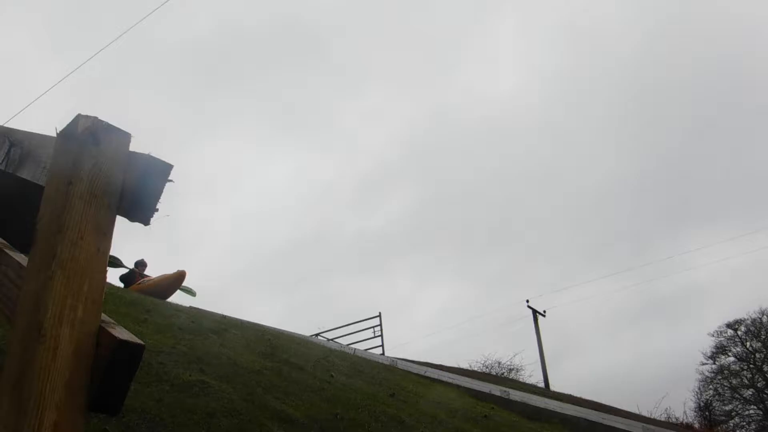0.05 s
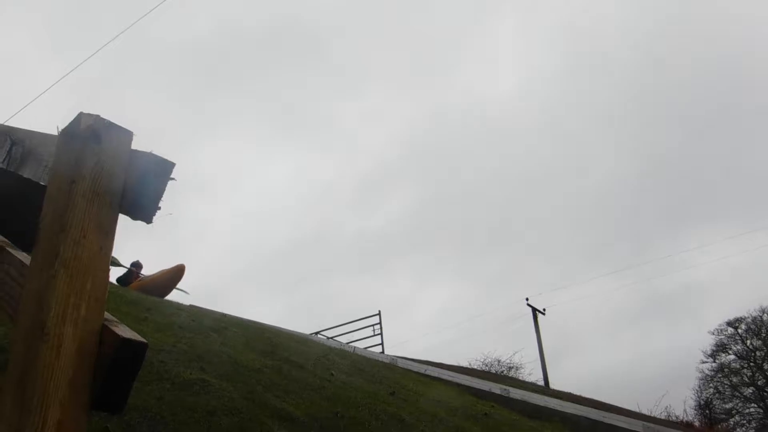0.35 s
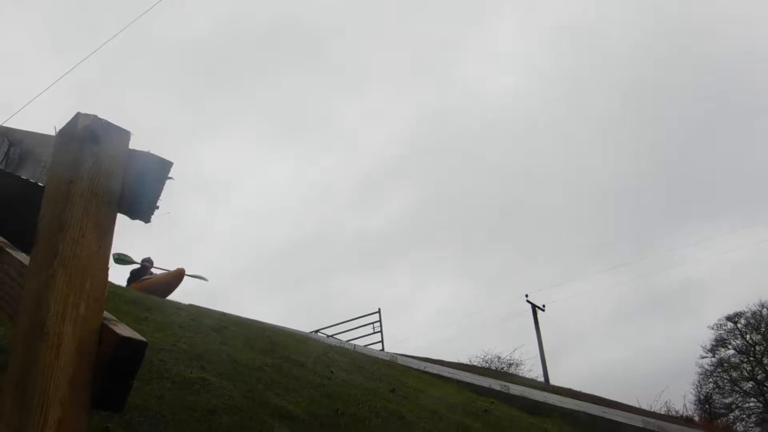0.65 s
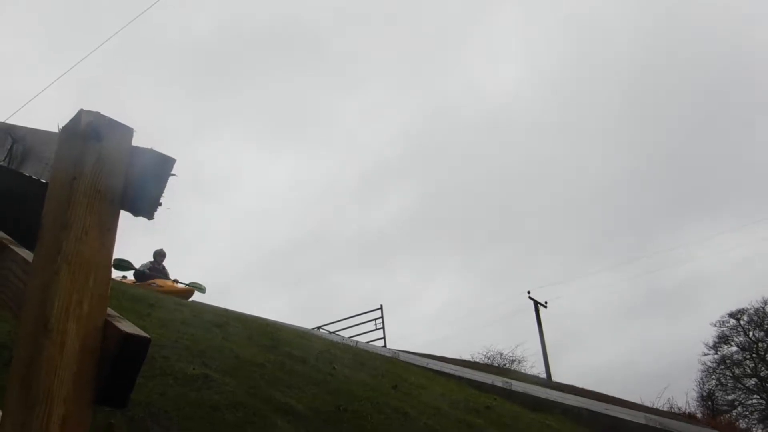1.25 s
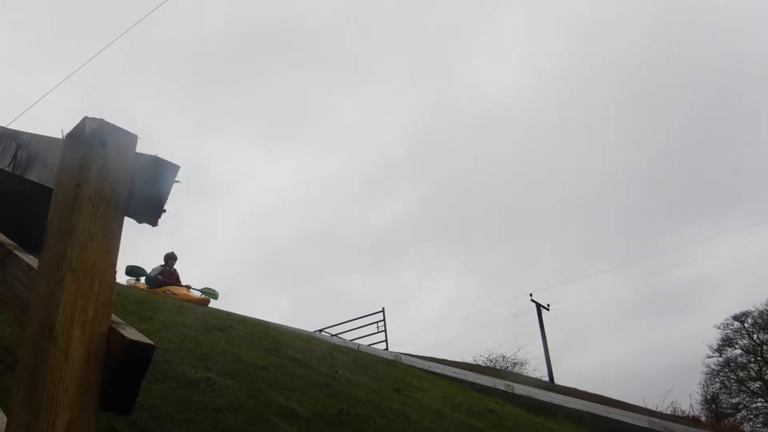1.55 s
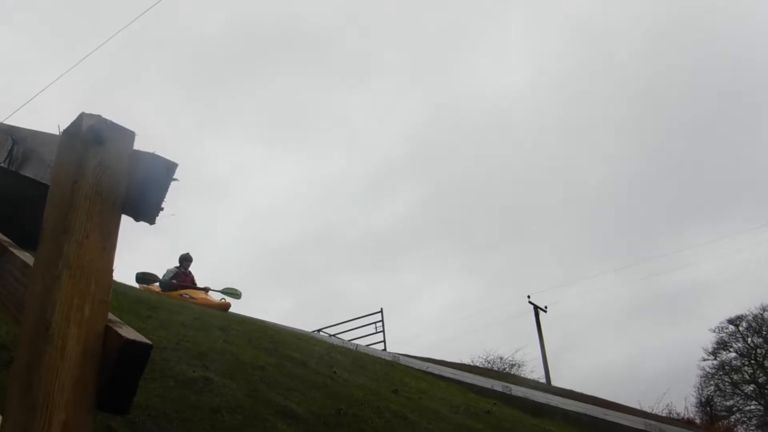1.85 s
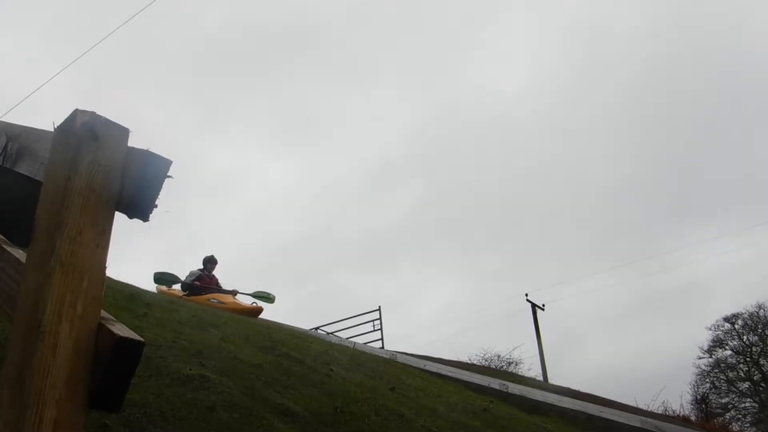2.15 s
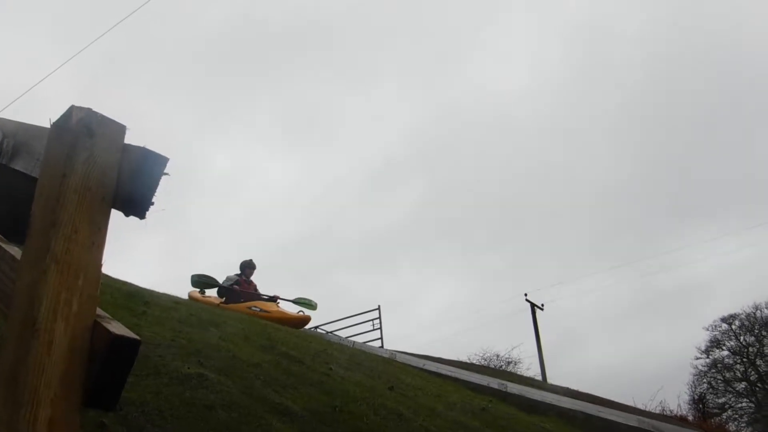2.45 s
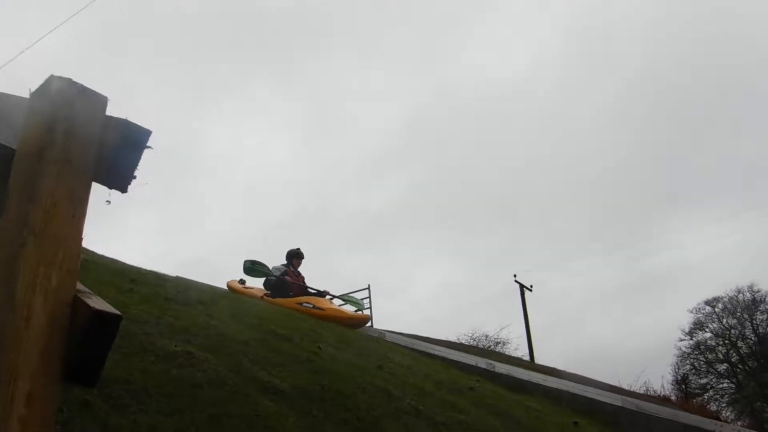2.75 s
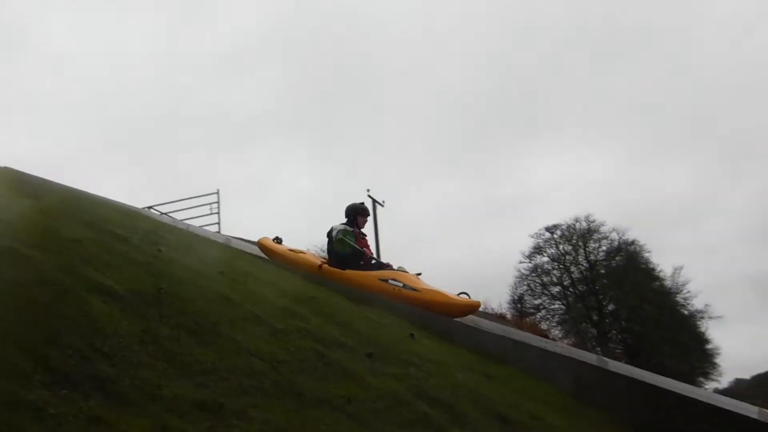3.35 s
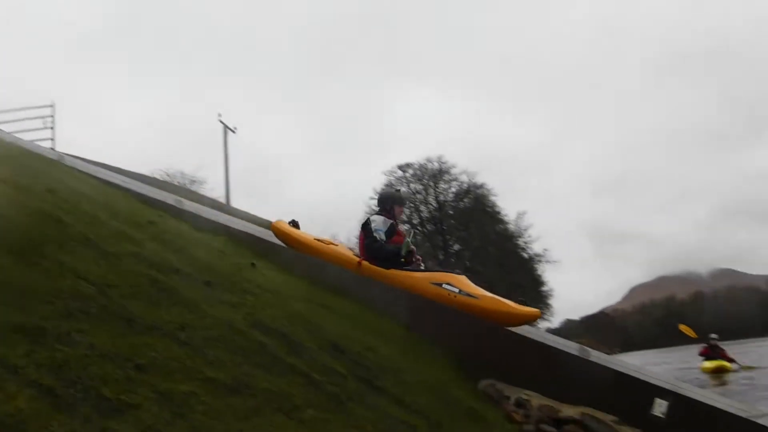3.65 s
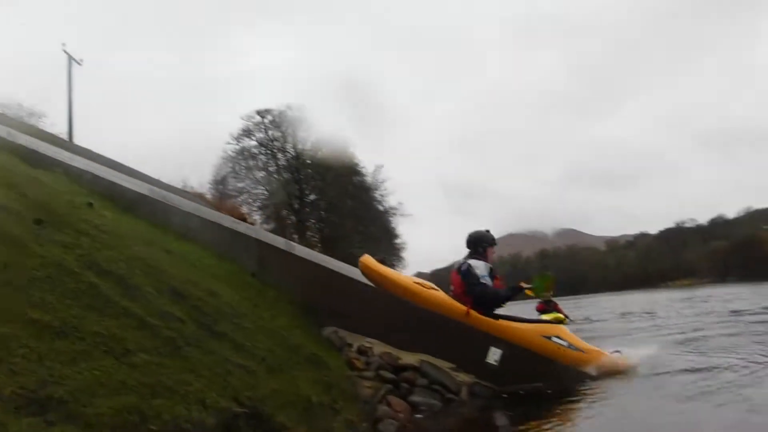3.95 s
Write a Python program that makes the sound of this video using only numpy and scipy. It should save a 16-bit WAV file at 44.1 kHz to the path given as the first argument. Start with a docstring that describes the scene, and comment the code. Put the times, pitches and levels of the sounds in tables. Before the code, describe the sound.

A plastic kayak slides down a grassy bank. For the first second it shuffles faintly, with soft thuds and a short rasp, then drops flat with a hollow knock at about 1 second. Hissing grass and the hull's scraping drone build steadily over small bumps. From about 3 seconds it passes close, skipping, with low rumble and a little wind, loudest just before 4 seconds.

```python
"""A plastic kayak shuffles at the top of a wet grass bank, with soft thuds and a short dry rasp.
At 1 s it drops flat: the impact rings its hull with a knock, and loose gear ticks. It then slides down,
grass hissing against the shell while stick-slip friction makes the hollow hull drone and lumps thud.
From about 3 s it passes close by and skips as it gathers speed; a little wind rises, and the loudest
hiss overloads the recorder. Ground rumble and a faint outdoor wash lie underneath."""
import sys
import numpy as np
from scipy import signal
from scipy.fft import rfft, irfft
from scipy.io import wavfile
from scipy.ndimage import map_coordinates

SR = 44100
rng = np.random.default_rng(int(sys.argv[2]) if len(sys.argv) > 2 else 0)


def generate_wav(signal):
    """Clip the signal to [-1, 1] and save it as 16-bit WAV at the path in sys.argv[1]."""
    frames = np.transpose(np.atleast_2d(signal))
    scaled = np.clip(frames, -1, 1) * 32767
    pcm = np.round(scaled).astype(np.int16)
    wavfile.write(sys.argv[1], SR, pcm)


N = 176400
T = np.arange(N) / SR

KNOCK_S, NEAR_FROM_S, NEAR_BY_S = 1.008, 2.91, 3.3
SLIPS_PER_S, SLIP_SPREAD_DB = 2500, 2


def amp(db):
    """Amplitude ratio of a level in decibels."""
    return 10 ** (np.asarray(db) / 20)


def unit(x):
    """Normalisation to rms 1."""
    return x / np.std(x)


def envelope(points):
    """Amplitude over time through (time_s, level_db) points."""
    return amp(np.interp(T, *np.array(points).T))


def colour(x, points):
    """Minimum-phase filtering through (frequency_hz, gain_db) points, to rms 1."""
    hz, db = np.array(points).T
    gain = amp(np.interp(np.log(np.fft.rfftfreq(N, 1 / SR) + 1), np.log(hz), db))
    cepstrum = irfft(np.log(gain), N)
    cepstrum[1:N // 2] *= 2  # folding the cepstrum makes the filter causal
    cepstrum[N // 2 + 1:] = 0
    return unit(irfft(rfft(x) * np.exp(rfft(cepstrum)), N))


def wander(per_s):
    """Smooth random modulation with standard deviation 1."""
    return unit(map_coordinates(rng.standard_normal(N // 20), [T * per_s], order=3, mode="mirror"))


def grains(per_s, spread_db):
    """Shot noise: tiny impulses at random moments, a few stronger than the rest."""
    size = amp(spread_db * np.minimum(rng.exponential(size=N), 2 * np.pi))
    occurs = rng.random(N) < per_s / SR
    return unit(occurs * np.sign(rng.standard_normal(N)) * size)


def approach(far, near):
    """Equal-power crossfade from far to near as the boat comes alongside."""
    share = np.clip((T - NEAR_FROM_S) / (NEAR_BY_S - NEAR_FROM_S), 0, 1)
    return np.sqrt(1 - share) * far + np.sqrt(share) * near


def grass_hiss(tufts):
    """Blades flicking the plastic superpose into shot noise; coarse tufts add short scuffs."""
    # hiss spectra, far and near: frequency_hz, gain_db
    far_spectrum = [(250, -49), (600, -28), (1500, -9.5), (2600, -9), (4000, -7), (5200, -5.5),
                    (6200, -1.5), (7000, 0), (8000, -5.5), (9500, -14), (11500, -26.5), (15500, -43)]
    near_spectrum = [(400, -41.5), (1100, -19.5), (2200, -10), (3050, -9), (3600, -9.5), (4800, -9),
                     (6100, -1), (7000, 1), (8000, -5.5), (9500, -15), (11500, -24.5), (15500, -40)]
    # grass brushing the hull: time_s, level_db
    brushing = [(.08, -49.5), (.26, -51.5), (.32, -48.5), (.44, -49.5), (.56, -56), (.93, -53), (1.0, -48),
                (1.1, -51.5), (1.24, -43.5), (1.34, -44.5), (1.45, -40.5), (1.8, -35.5), (2.0, -29.5),
                (2.5, -26.5), (2.65, -22), (3.0, -15.5), (3.08, -16.5), (3.17, -12), (3.26, -14),
                (3.29, -7.5), (3.37, -9.5), (3.42, -4.5), (3.46, -9), (3.55, -3.5), (3.59, -8), (3.7, -4),
                (3.77, -6), (3.82, 0), (3.86, -11.5), (3.92, -4)]
    # scuffs over coarse tufts: start_s, level_db, decay_s
    scuffs = [(.138, -44.5, .012), (.193, -42, 0.0033), (.215, -44, 0.018), (.268, -45, 0.0073),
              (.967, -41, 0.014), (1.172, -37, 0.011), (1.222, -40.5, 0.017), (2.247, -21, 0.019),
              (2.543, -30, 0.01), (2.622, -20, 0.017), (2.755, -18, 0.007), (2.849, -13.5, .012),
              (2.915, -12, 0.0099), (3.392, -5, 0.0097)]
    attack_s, tuft_db = 0.0029, 0.96
    far = colour(grains(per_s=9000, spread_db=1.5), far_spectrum)
    near = colour(grains(per_s=9000, spread_db=1.5), near_spectrum)
    scuffing = 0
    for start_s, level_db, decay_s in scuffs:
        rise = np.clip((T - start_s) / attack_s, 0, 1)
        fall = np.exp(-np.maximum(T - start_s - attack_s, 0) / decay_s)
        scuffing += amp(level_db) * rise * fall
    return approach(far, near) * np.hypot(envelope(brushing) * amp(tuft_db * tufts), scuffing)


def stick_slip(pitch_hz, width_hz):
    """Friction impulses excite a resonance, applied twice for steep sides; rms 1."""
    slips = grains(SLIPS_PER_S, SLIP_SPREAD_DB)
    b, a = signal.iirpeak(pitch_hz, pitch_hz / width_hz / 2, fs=SR)
    return unit(signal.lfilter(b, a, signal.lfilter(b, a, slips)))


def hull_drone(tufts):
    """Forced vibration: stick-slip drives the hollow shell, favouring higher modes with speed."""
    # hull resonances: pitch_hz, width_hz, far_db, near_db
    modes = [(223, 86, -19.5, -4), (352.6, 55, -6.5, -17), (428, 57, -2, -9.5), (515, 55, -2.5, -9.5),
             (643, 84, -10.5, 1), (770, 85, 1.5, 1), (904, 64, 0.5, -2), (1083, 116, 0, -4.5),
             (1280, 110, -3.5, 4.5), (1473, 110, -1.5, 0.5), (1880, 200, -6.5, -0.5)]
    # the hull rubbing on the ground: time_s, level_db
    rubbing = [(.08, -56.5), (.32, -58), (.375, -50.5), (.46, -63.5), (1.1, -61), (1.21, -43), (1.35, -43),
               (1.48, -36.5), (1.58, -41), (1.73, -37), (1.8, -37.5), (2.03, -34.5), (2.4, -32),
               (2.52, -33), (2.65, -30), (3.18, -26.5), (3.29, -24), (3.82, -21.5), (3.87, -29),
               (3.98, -21)]
    brighten_db_per_octave_s, even_at_s, pivot_hz = 2, 1.72, 780
    swell_db, tuft_db = 2, 1.5
    tilt_db_per_octave = brighten_db_per_octave_s * (np.clip(T, KNOCK_S, NEAR_FROM_S) - even_at_s)
    drone, power = 0, 0
    for pitch_hz, width_hz, far_db, near_db in modes:
        gain = approach(amp(far_db + tilt_db_per_octave * np.log2(pitch_hz / pivot_hz)), amp(near_db))
        # the contact point wanders along the hull, so each mode swells by itself
        gain *= amp(swell_db * wander(per_s=11))
        drone += gain * stick_slip(pitch_hz, width_hz)
        power += gain ** 2
    return drone / np.sqrt(power) * envelope(rubbing) * amp(tuft_db * tufts)


def ground_contact():
    """Friction needs contact: its gain fades as the hull lifts and snaps back on landing."""
    # skips of the hull: landing_s, lift_s, drop_db
    skips = [(3.241, 0.039, 17.5), (3.756, 0.018, 4), (3.881, 0.022, 5)]
    settle_s = 0.0092
    loss_db = sum(drop_db * np.interp(T, [landing_s - lift_s, landing_s, landing_s + settle_s], [0, 1, 0])
                  for landing_s, lift_s, drop_db in skips)
    return amp(-loss_db)


def ring(start_s, modes):
    """Free vibration: struck modes (pitch_hz, level_db, t60_s) decay exponentially."""
    age = np.maximum(T - start_s, 0)
    return sum(amp(db - 60 * age / t60) * np.sin(2 * np.pi * hz * age) for hz, db, t60 in modes)


def shudder(blow, level_db, decay_s, low_hz):
    """Scattering in the shell gives a blow a diffuse tail; the deepest bass does not radiate."""
    age = T[:SR // 8]
    tail = rng.standard_normal(len(age)) * np.exp(-age / decay_s)
    diffuse = amp(level_db) * signal.fftconvolve(blow, tail / np.linalg.norm(tail))[:N]
    return signal.sosfilt(signal.butter(2, low_hz, "high", fs=SR, output="sos"), blow + diffuse)


def thuds():
    """Soft impacts: each lump pushes the hull's low modes with a half-sine force pulse."""
    # blows from lumps: start_s, level_db, pitch_hz
    lumps = [(.222, -44, 180), (0.251, -41, 150), (.583, -45, 150), (.598, -39, 180), (.63, -45, 140),
             (.755, -43, 160), (0.832, -44, 200), (1.293, -43, 110), (1.352, -44, 95), (1.403, -35, 160),
             (1.446, -37, 130), (1.663, -45, 140), (1.736, -36, 124), (1.768, -30.5, 140), (1.86, -39, 130),
             (2.013, -41, 170), (2.339, -33, 165), (2.616, -30, 135), (2.854, -34, 170), (3.5, -25, 180)]
    # modes of a thud: pitch_ratio, gain_db, t60_s
    modes = [(.65, -14, .05), (1, -1, 0.038), (1.35, -6, 0.055)]
    push_s = 0.0017
    push = np.sin(np.pi * np.minimum(T[:SR // 50] / push_s, 1))
    ringing = sum(amp(level_db) * ring(start_s, [(pitch_hz * ratio, db, t60) for ratio, db, t60 in modes])
                  for start_s, level_db, pitch_hz in lumps)
    softened = signal.fftconvolve(ringing, push / push.sum())[:N]
    return shudder(softened, level_db=-6, decay_s=0.011, low_hz=65)


def knock():
    """Impulse response of the hull as it drops flat."""
    # modes of the struck hull: pitch_hz, gain_db, t60_s
    modes = [(156, -8, 0.073), (215, -5.5, 0.11), (345, -0.5, 0.096), (807, 2.5, 0.035), (1046, -6, .04),
             (1260, -5, .04), (1430, -8, .035)]
    return shudder(amp(-29.5) * ring(KNOCK_S, modes), level_db=-8, decay_s=0.015, low_hz=115)


def gear_tick():
    """A piece of gear rings in one damped mode just after the knock."""
    pitch_hz, level_db, t60_s = 3040, -38, 0.038
    return ring(start_s=1.021, modes=[(pitch_hz, level_db, t60_s)])


def rasp():
    """Dry friction swells once as the boat rocks at the top of the bank."""
    # scraping resonances: pitch_hz, width_hz, gain_db
    bands = [(1310, 400, -4), (1830, 210, 2)]
    peak_s, half_width_s, level_db = 0.39, 0.071, -48
    scrape = sum(amp(gain_db) * stick_slip(pitch_hz, width_hz) for pitch_hz, width_hz, gain_db in bands)
    return unit(scrape) * amp(level_db) * np.exp(-((T - peak_s) / half_width_s) ** 2)


def rumble():
    """Random excitation by small bumps in the ground keeps the hull rumbling."""
    # strength of the rumble: time_s, level_db
    levels = [(0, -77), (1.1, -65), (1.3, -59), (2.5, -54), (2.85, -47), (3.2, -47), (3.32, -49),
              (3.9, -42), (4, -22)]
    # its spectrum: frequency_hz, gain_db
    spectrum = [(20, -19), (60, -3.5), (120, -5.5), (170, 5), (215, -0.5), (280, -20), (800, -53)]
    return colour(grains(per_s=350, spread_db=1.0), spectrum) * envelope(levels)


def outdoor_wash():
    """Distant broadband noise, its level wavering slightly."""
    # ambient spectrum: frequency_hz, gain_db
    spectrum = [(30, -16), (150, -11), (400, -8), (850, -6.5), (1300, 1.5), (1650, -1), (2500, -11),
                (5000, -29.5), (10000, -18), (15500, -17)]
    level_db, waver_db = -52.5, 0.63
    return colour(rng.standard_normal(N), spectrum) * amp(level_db + waver_db * wander(per_s=13.6))


def wind():
    """Low-frequency turbulence at the microphone as it swings after the boat."""
    level_db, start_s, rise_s, cutoff_hz = -45, 3.04, 0.34, 85
    buffet = signal.sosfilt(signal.butter(2, cutoff_hz, fs=SR, output="sos"), rng.standard_normal(N))
    return unit(buffet) * amp(level_db) * np.clip((T - start_s) / rise_s, 0, 1)


def scene():
    """Superposition of all sources; the same uneven turf modulates both hiss and drone."""
    tufts = wander(per_s=70)
    sliding = ground_contact() * (grass_hiss(tufts) + hull_drone(tufts))
    return (sliding + thuds() + knock() + gear_tick() + rumble() + outdoor_wash() + wind() + rasp())[None]


def record(dry):
    """After a brief silence, saturation flattens the loudest peaks and a low-pass limits the band."""
    start_s, ceiling, top_hz = 0.073, 0.89, 15700
    saturated = dry / (1 + (dry / ceiling) ** 16) ** (1 / 16)
    low_pass = signal.ellip(10, .1, 70, top_hz, fs=SR, output="sos")
    return signal.sosfilt(low_pass, saturated * (T > start_s))


dry = scene()
out = record(dry)
generate_wav(out)
```